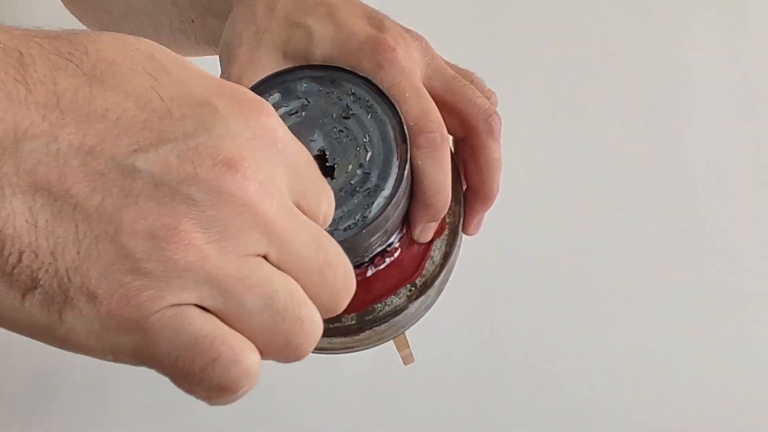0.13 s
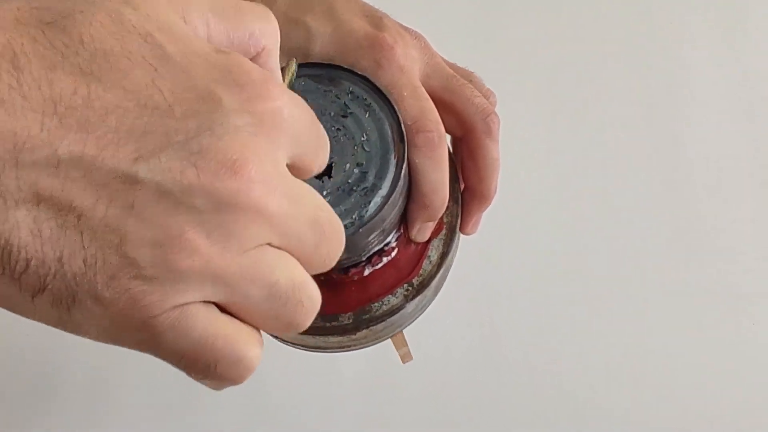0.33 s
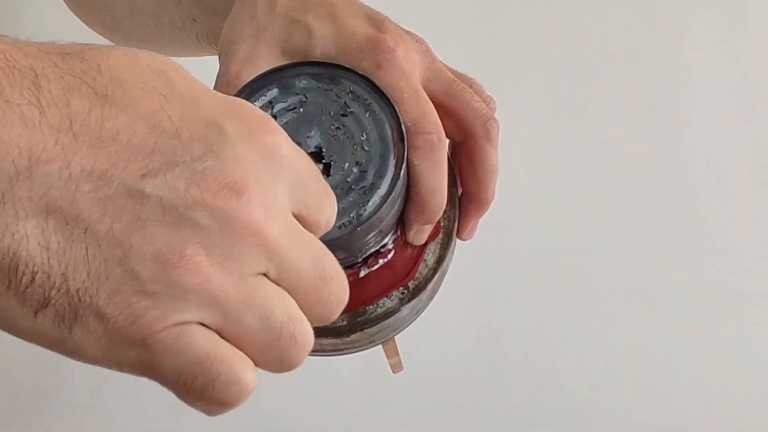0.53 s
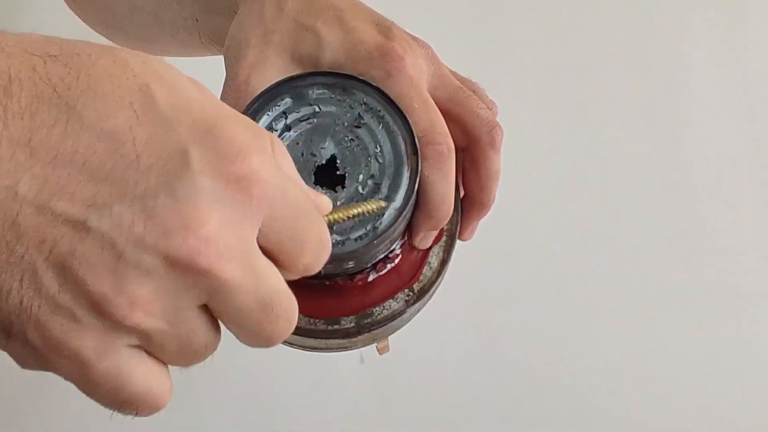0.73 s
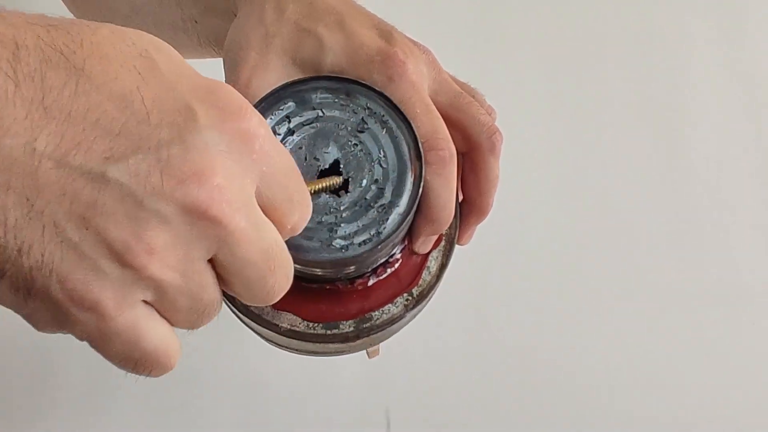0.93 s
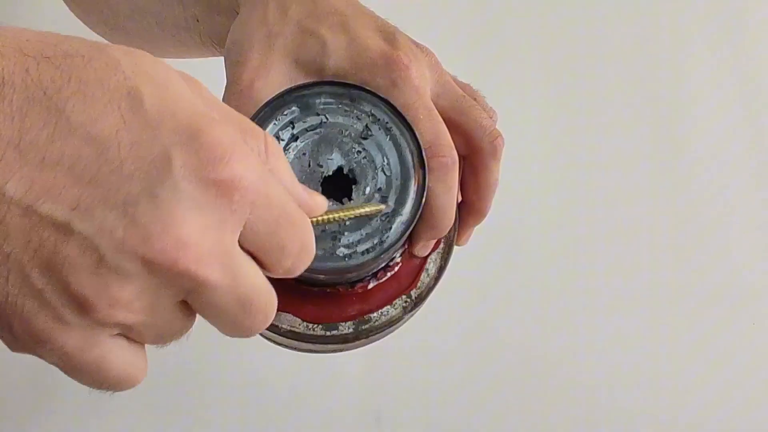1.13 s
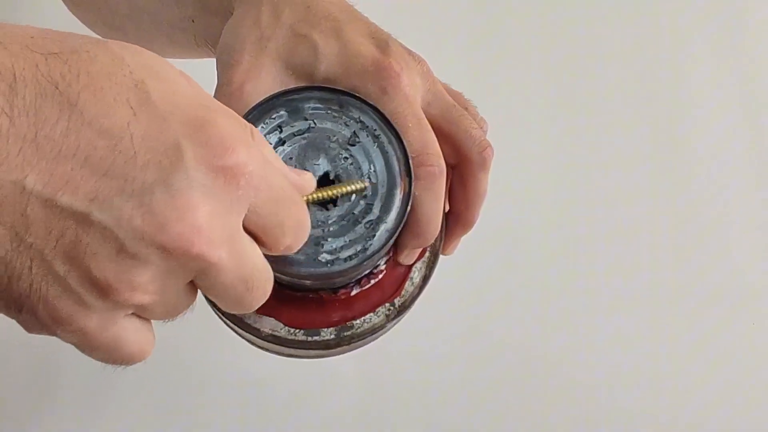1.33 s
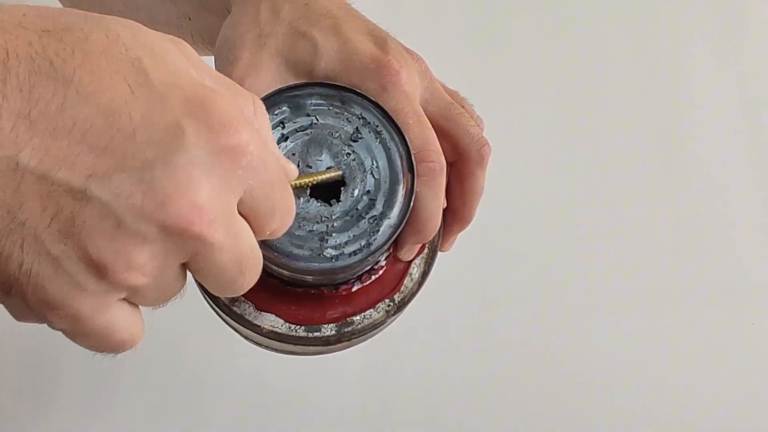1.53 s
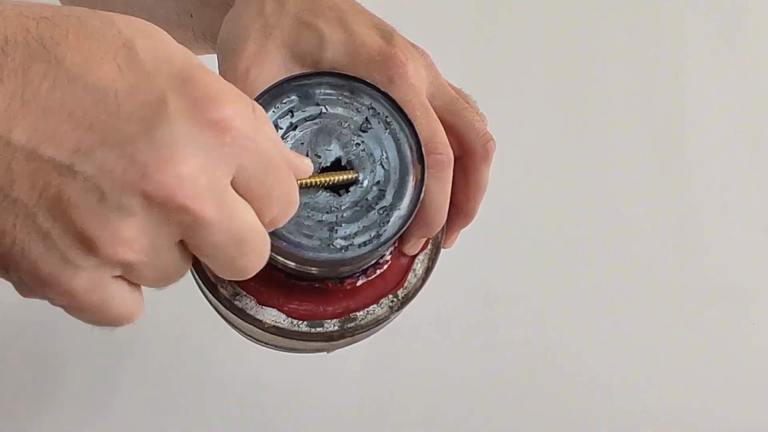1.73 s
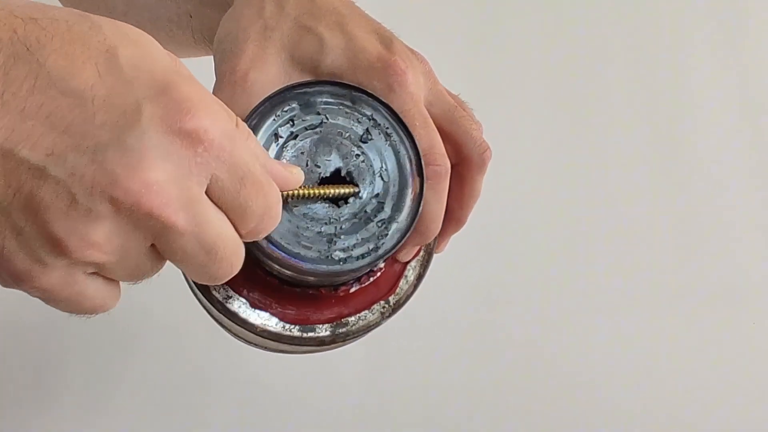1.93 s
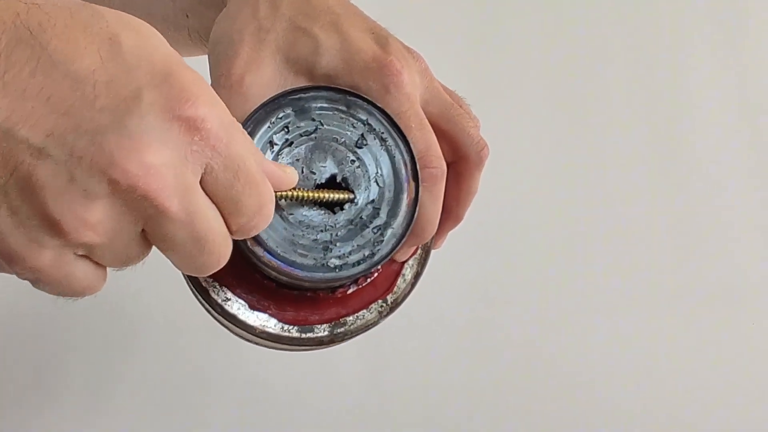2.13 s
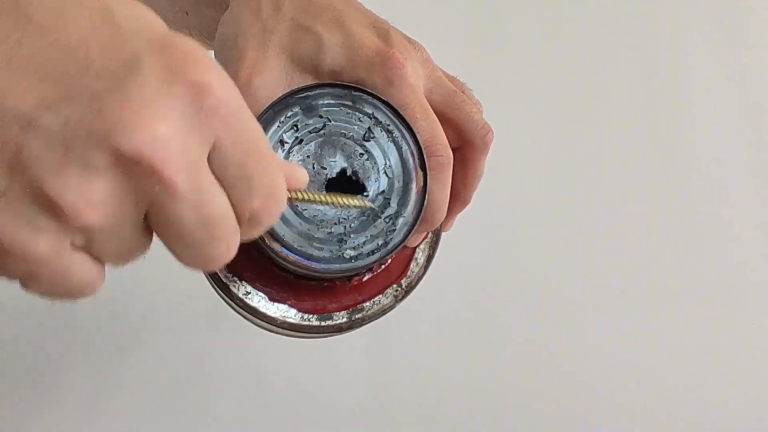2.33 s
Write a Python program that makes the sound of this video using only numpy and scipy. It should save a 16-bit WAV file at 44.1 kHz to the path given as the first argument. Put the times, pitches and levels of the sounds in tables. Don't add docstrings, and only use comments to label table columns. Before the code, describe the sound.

A screw scrapes a jagged hole in a hand-held tin, close up in a small room. After a trailing scrape at the start, hollow clicks crunch at 0.24-0.34 s, with a hard snap ending them. Short bursts follow at 0.6-0.73, a dense one at 1.04-1.15, a softer one at 1.32, rattling catches at 1.7-1.76, then weaker ticks near 1.93, 2.0 and 2.26. Faint rings, low rumble and slight hiss remain.

```python
import sys
import numpy as np
from scipy import signal
from scipy.fft import rfft, irfft
from scipy.io import wavfile

SR = 44100
rng = np.random.default_rng(int(sys.argv[2]) if len(sys.argv) > 2 else 0)


def boost_factor(decibels):
    exponent = np.asarray(decibels, float) / 20
    return 10 ** exponent


def digitize_waveform(pressure):
    field = np.atleast_2d(pressure).T
    bounded = np.clip(field, -1, 1)
    quanta = np.round(bounded * 32767).astype(np.int16)
    wavfile.write(sys.argv[1], SR, quanta)


N = 110250
LEAD_S = .1
CREEP_MS = 1.384


def evened(x):
    return x / np.sqrt(np.mean(x ** 2) + 1e-20)


def read(points, hz):
    f, value = np.transpose(points)
    return np.interp(np.log(hz + 1), np.log(f + 1), value)


def coloured(x, points):
    gain = boost_factor(read(points, np.fft.rfftfreq(len(x), 1 / SR)))
    return irfft(rfft(x) * gain, len(x))


def slip(s, peak_db, upper_db, grit_db, length_ms):
    # frequency in Hz, width in Hz, level in dB.
    held = [(319.5, 350, -34.5), (492.3, 62.7, -14.5), (1000, 47.2, 3.34), (1524, 31, 1), (1909, 48, -2.5),
            (2299, 18.7, -8), (2963, 37.5, -15), (3300, 190, -21), (3900, 160, -24.5), (4610, 120, -25.5),
            (5770, 120, -35.5), (7200, 440, -33), (10900, 200, -40.5)]
    # start in seconds, main mode in Hz, favoured upper mode in Hz,
    # level of the modes below the main one in dB.
    strokes = [(-.1, 1000, 2020, -2), (.23, 1023, 2700, -2), (.30, 984, 2070, 5), (.59, 1006, 2920, -1),
               (.67, 1000, 2930, 0.5), (1.03, 1002, 4090, -3.5), (1.12, 976, 3080, 2),
               (1.31, 1000, 2750, 5), (1.69, 998, 3250, 1), (1.88, 991, 3300, 3), (1.99, 982, 2830, 11.5),
               (2.25, 923, 3760, 7.5)]
    # frequency in Hz, level in dB per Hz.
    grit_colour = [(250, -5.5), (1500, -0.5), (3500, -6), (5500, -17), (8500, -25.5), (11300, -25),
                   (14500, -29.5)]
    fizz_db = [-15.5, 3, -0.5, 5.5, -0.5, 2.5, 5, 1, 3, 4, 1, -1.5]
    fizz_hz, fizz_edge_hz = 10800, 730
    upper_hz, favour_db = 1300, 2.5
    spot_db, spot_detune, widen = 3, 0.018, 0.7
    rise_ms, grit_t60_s = 1.92, 0.015

    u = np.arange(4096) / SR
    ms = u[:2048] * 1000
    chance = rng.random(2048)
    size = rng.exponential(1, 2048)
    sign = rng.choice([-1., 1.], 2048)
    grit = rng.standard_normal(2048)
    spot, tune = rng.standard_normal((2, len(held)))

    fade_db = np.maximum(-8 * (ms / max(length_ms, .3)) ** 2, -120)
    force = np.minimum(ms / rise_ms + 0.087, 1) * boost_factor(fade_db)
    ticks = (chance < 4000 / SR) * sign * boost_factor(5.5 * np.minimum(size, 3)) * force

    hz, width, db = np.transpose(held)[:, :, None]
    stroke = sum(grip[0] <= s for grip in strokes) - 1
    _, main_hz, favoured_hz, low_db = strokes[stroke]
    main = db.argmax()
    octaves_squared = np.log2(hz / favoured_hz) ** 2
    db = db + low_db * (hz < hz[main]) - favour_db * (hz > upper_hz) * np.minimum(octaves_squared, 1.5)
    hz = np.where(hz == hz[main], main_hz, hz)
    width = np.maximum(width, .028 * hz)
    db = db + spot_db * spot[:, None] * np.where(hz > upper_hz, 1, .5)

    decay = np.exp(-np.pi * widen * width * u)
    soft_start = 1 - np.exp(-u * 1000 / 0.36)
    body = decay * soft_start * np.sin(2 * np.pi * hz * (1 + spot_detune * tune[:, None]) * u)
    body[main] *= np.cos(np.pi * 34.8 * u)
    modes = signal.fftconvolve(ticks[None], body, axes=1)
    modes *= boost_factor(db) * width / abs(modes).max(1, keepdims=True)
    lower = modes[hz[:, 0] < upper_hz].sum(0)
    upper = modes[hz[:, 0] > upper_hz].sum(0)
    knock = lower / abs(lower).max() + boost_factor(upper_db) * upper / abs(upper).max()

    rasp = boost_factor(-14) * np.minimum(ms / rise_ms, 1) * np.exp(-(ms / 42) ** 2)
    rough = signal.lfilter([1], [1, -boost_factor(-60 / (grit_t60_s * SR))], abs(ticks))
    dust = evened(coloured(coloured(grit, grit_colour), np.c_[hz, spot_db * tune]))
    dust = coloured(dust, [(fizz_hz - fizz_edge_hz, 0), (fizz_hz, fizz_db[stroke])])
    knock[:2048] += boost_factor(16 + grit_db) * (rough / rough.max() + rasp) * dust
    return boost_factor(peak_db) * knock / abs(knock).max()


def snap(s, peak_db, hz):
    rise_ms, click_ms = 0.29, 0.033
    ms = np.maximum(np.arange(2048) * 1000 / SR - CREEP_MS, 0)
    decay_ms = 4.97 * (hz / 1000) ** -0.65
    mode = (1 - np.exp(-ms / rise_ms)) * np.exp(-ms / decay_ms) * np.sin(2 * np.pi * hz * ms / 1000)
    click = (ms > 0) * (1 - ms / click_ms) * np.exp(-ms / click_ms) * min(hz / 2000, 1) ** 2
    return boost_factor(peak_db) * (mode + boost_factor(-6) * click)


def room(x):
    # frequency in Hz, t60 in seconds.
    room_t60 = [(200, 1), (530, 0.28), (1400, 0.6), (3700, 0.4555), (7000, 0.47), (12000, 0.29)]
    # frequency in Hz, level in dB.
    room_tone = [(200, -9.5), (480, 6), (750, -7), (1000, -3), (3500, -0.6), (7000, -1), (12000, -4.5)]
    room_db, gap_s = -13, 0.0077
    t, out = np.arange(len(x)) / SR, 0
    for k in range(3):
        taps = np.zeros(SR)
        at = np.arange(0, SR - 20, 20) + rng.integers(0, 20, SR // 20 - 1)
        taps[at] = rng.choice([-1., 1.], at.shape) * (at > gap_s * SR)
        hz, u, z = signal.stft(taps, SR, nperseg=256)
        tail_db = read(room_tone, hz)[:, None] - 60 * u / read(room_t60, hz)[:, None]
        tail = signal.istft(z * boost_factor(tail_db), SR, nperseg=256)[1]
        turn = np.sqrt(2 / 3) * np.cos(2 * np.pi * (3 * t + k / 3))
        out = out + signal.fftconvolve(x * turn, tail / np.linalg.norm(tail))[:len(x)]
    return boost_factor(room_db) * out


def background():
    # frequency in Hz, level in dB per Hz.
    rumble_colour = [(10, 2.5), (22, -3), (38, -9), (54, -2), (75, -21), (200, -25), (330, -61)]
    # frequency in Hz, level in dB per Hz.
    hiss_colour = [(88, -49), (150, 5.5), (324, -7.5), (432, -10), (1170, -5.5), (1390, -29), (1510, -13.5),
                   (9360, -32.5), (14800, -38)]
    # time in seconds, level in dB.
    swell_points = [(0, 6), (.4, 7), (1.0, 4.5), (1.501, 5.5), (1.9, 8), (2.3, 9), (2.5, 4)]
    rumble_db, hiss_db = -61.5, -72.5
    a, b = rng.standard_normal((2, N))
    swell = np.interp(np.arange(N) / SR, *np.transpose(swell_points))
    rumble = boost_factor(rumble_db + swell) * evened(coloured(a, rumble_colour))
    hiss = boost_factor(hiss_db) * evened(coloured(b, hiss_colour))
    return rumble + hiss


def ring(s, db, length):
    # frequency in Hz, level in dB, t60 in seconds.
    free = [(1140, 7, 1), (1495, 3, 0.2)]
    t = np.arange(round(length * SR)) / SR
    hz, mode_db, t60 = np.transpose(free)[:, :, None]
    edges = np.clip(np.minimum(t / .005, (length - t) / .012), 0, 1)
    modes = boost_factor(db + mode_db - 60 * t / t60) * np.sin(2 * np.pi * hz * t)
    return edges * modes.sum(0)


def screw():
    # start in seconds, peak in dB, upper modes in dB, grit in dB,
    # burst length in ms. The same columns serve all four tables.
    extra_slips = [
        (-.03, -23, -10, -33.5, 16.1),
        (.594, -45.5, -13, -32, 9.8),
        (.689, -29, -4.5, -31, 7.3),
        (1.326, -38.5, 3, -23, 17.4),
        (1.694, -47.5, -18, -27.5, 5),
        (1.739, -29, -29, -28.5, 4.5),
    ]
    early_slips = [(0.237, -28.5, -10, -32, 5.4), (0.243, -28.5, -41, -44, 7.1),
                   (0.252, -24.5, -36, -31, 3.3), (0.262, -28, -2, -32, 5), (0.271, -30, -30, -40, 2.2),
                   (0.283, -34, -26, -29, 2.5), (0.31, -24.5, -3.5, -31, 7.7), (0.325, -26, 4.5, -24, 4.1),
                   (0.34, -36, -36, -22, 6), (0.415, -50, -44, -52.5, 34), (0.601, -40, -23, -25, 9.2),
                   (0.613, -33, -16, -30, 10), (0.622, -32.5, -19, -34, 3.5), (0.677, -30, -15, -30.5, 2.8),
                   (0.681, -25.5, -1, -28, 4.3), (0.7, -27, -15, -27, 4.1), (0.72, -36, -7, -27, 2.5),
                   (0.728, -51, -15, -38, 2.9)]
    middle_slips = [(1.037, -29, -27, -21, 8.6), (1.044, -23, -19, -33, 4.3), (1.05, -29.5, 7, -41, 8.2),
                    (1.063, -28.5, -32, -39, 1.07), (1.066, -31.5, -2, -32.5, 11),
                    (1.082, -27, -9, -29, 3.3), (1.087, -32, -1.5, -47, 7.2), (1.125, -30, -32, -30, 6.1),
                    (1.138, -24.5, -23, -27.5, 4.73), (1.141, -38, -4, -25.5, 14),
                    (1.147, -40, -11, -4, 1.2), (1.318, -36.5, -6.5, -33, 5.6),
                    (1.332, -38, -43, -28.5, 3.5), (1.446, -56, -18, -13, 4.2)]
    late_slips = [(1.698, -36.5, -23, -37, 1.07), (1.704, -37, -20, -23.5, 12),
                  (1.715, -39, -25, -26.5, 3.5), (1.731, -25, -14, -19, 4), (1.745, -28, 6.5, -13, 8),
                  (1.75, -30, -7, -65, 3.9), (1.754, -30, -29, -26, 3.4), (1.763, -37.5, -29, -32, 8.7),
                  (1.839, -50.5, -27, -6, 13), (1.892, -43, -8, -38, 7.9), (1.92, -36.5, -2, -28, 3.2),
                  (1.926, -40, -10, -44, 10), (1.934, -38.5, -13.5, -34, 5.5),
                  (1.999, -34.5, -8, -30.5, 5.7), (2.116, -47.5, -43, -34, 0.97),
                  (2.184, -57.5, -4, -25, 4.5), (2.253, -43, -15, -30, 7), (2.263, -30.5, -11.5, -23, 5)]
    # start in seconds, ring in dB, seconds until damped.
    lifts = [
        (.721, -49, 0.041),
        (.80, -67, .14),
        (1.143, -51.5, 0.041),
        (1.225, -65.5, 0.24),
        (1.336, -50.5, 0.05),
        (1.42, -66, 0.16),
        (2.006, -54, 0.044),
        (2.07, -71, 0.089),
        (2.27, -61.5, 0.062),
        (2.36, -74, 0.14),
    ]
    # start in seconds, peak in
    # dB, mode in Hz.
    extra_snaps = [
        (-.03, -28.5, 1533),
        (-.028, -27.5, 2240),
        (.0172, -45, 2040),
        (.7015, -45, 3500),
        (.709, -48, 2920),
        (2.0035, -32, 1000),
        (2.2665, -39, 2310),
    ]
    # start in seconds, peak in dB, mode in Hz.
    snaps = [(.2529, -36, 3300), (.262, -23.5, 1000), (.2644, -32.5, 2820), (.2714, -36.5, 2870),
             (.312, -33.5, 2830), (.3255, -25, 1832), (.3255, -36, 4030), (.3385, -14, 982),
             (.3417, -32, 2790), (.622, -39.5, 2900), (.6807, -34.5, 3630), (.6822, -52, 2050),
             (.6829, -30.5, 2910), (.6927, -37, 4100), (.7005, -23, 1004), (.722, -42, 2880),
             (1.0426, -35, 4450), (1.0431, -41, 5600), (1.0439, -36, 3030), (1.0439, -33, 2350),
             (1.0474, -39, 2400), (1.0496, -39, 5500), (1.0504, -33, 3150), (1.0509, -37, 2520),
             (1.0618, -40, 5350), (1.0623, -36, 3500), (1.0633, -29.5, 2430), (1.0686, -34.5, 4560),
             (1.0688, -36.5, 5470), (1.0688, -36, 3500), (1.0696, -29.5, 2320), (1.0808, -41, 5500),
             (1.0815, -39, 3360), (1.0865, -39, 1950), (1.0883, -37, 2760), (1.1257, -38, 3260),
             (1.1397, -35, 3300), (1.1436, -46, 3100), (1.1466, -42, 3270), (1.3355, -27.5, 976),
             (1.7135, -30.5, 1000), (1.7321, -27.5, 3284), (1.7343, -36, 4650), (1.7458, -26.5, 1937),
             (1.7458, -35, 3300), (1.7498, -47, 3240), (1.7498, -42, 5300), (1.753, -25.5, 906),
             (1.756, -34.5, 2930), (1.7602, -27, 1560), (1.84, -62, 11000), (1.9239, -46.5, 3340),
             (1.926, -36, 1000), (1.938, -48.5, 3300), (2.0002, -27, 1000), (2.0067, -40, 2880),
             (2.2624, -30.5, 885), (2.2641, -36, 3300), (2.262, -43, 4280), (2.265, -42, 5810)]
    out = np.zeros(N + SR)
    slips = [*extra_slips, *early_slips, *middle_slips, *late_slips]
    for rows, sound in (slips, slip), (lifts, ring), ([*extra_snaps, *snaps], snap):
        for s, *row in rows:
            part = sound(s, *row)
            at = round((s + LEAD_S - CREEP_MS / 1000) * SR)
            out[at:at + len(part)] += part
    low_cut = signal.butter(4, 220, "high", fs=SR, output="sos")
    return signal.sosfilt(low_cut, out)


def scene():
    # frequency in Hz, level in dB.
    side_colour = [(60, -41), (250, -53), (3500, -44.5), (5200, -21), (6800, -9), (14400, -8.5)]
    tin = screw()
    mid = (tin + room(tin))[round(LEAD_S * SR):][:N] + background()
    z = signal.stft(mid, nperseg=128)[2]
    side = signal.istft(z * np.exp(2j * np.pi * rng.random(z.shape)), nperseg=128)[1][:N]
    side = coloured(np.pad(side, (0, 4096)), side_colour)[:N] * np.sqrt(2)
    return np.array([mid + side, mid - side])


def top_cut(x):
    return signal.sosfilt(signal.butter(12, 14990, fs=SR, output="sos"), x)


def record(dry):
    edge = signal.firwin(255, 14000, window=("kaiser", 9), fs=SR)
    mix = signal.oaconvolve(dry, edge[None], "same")
    return top_cut(mix)


dry = scene()
out = record(dry)
digitize_waveform(out)
```